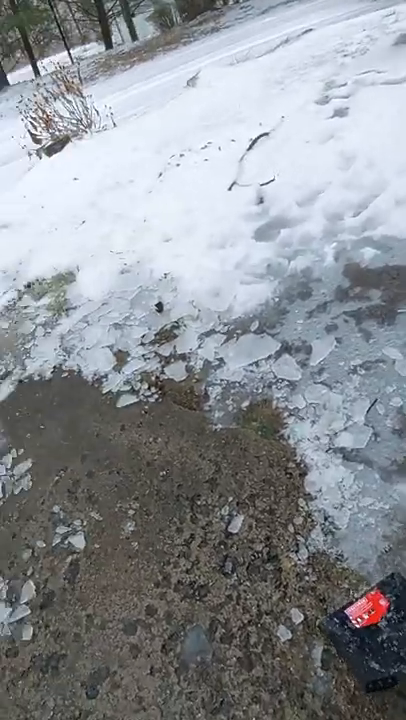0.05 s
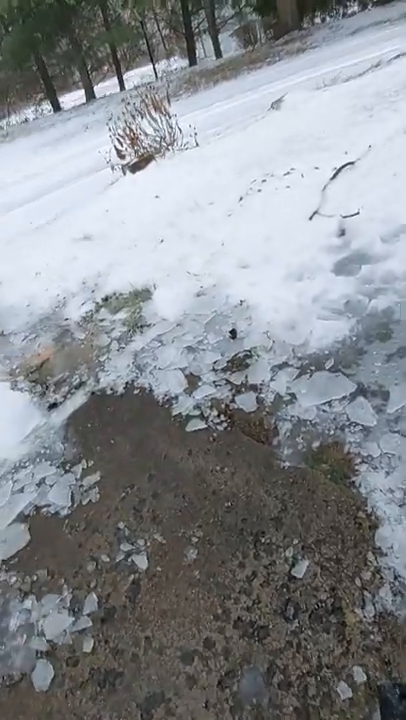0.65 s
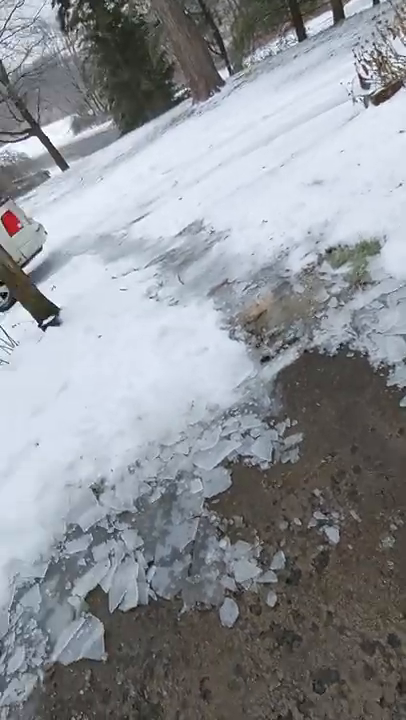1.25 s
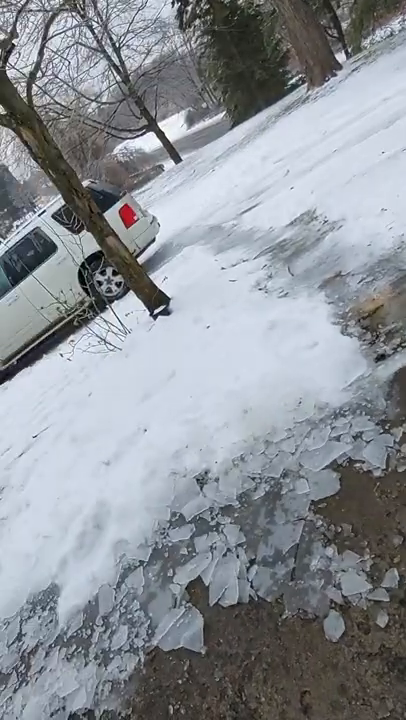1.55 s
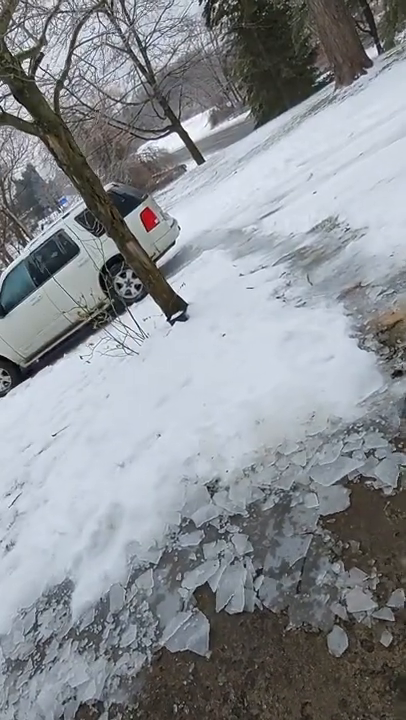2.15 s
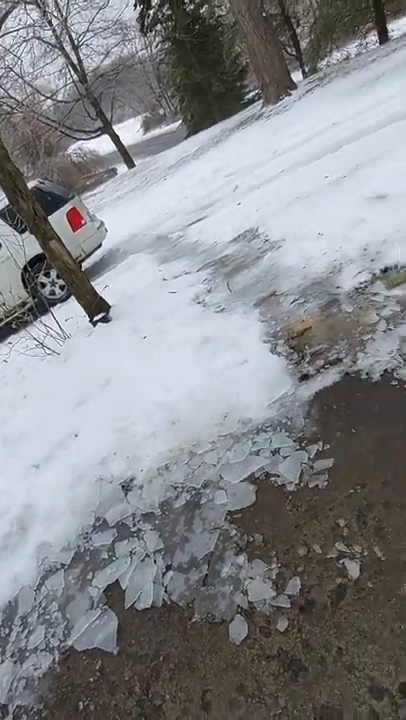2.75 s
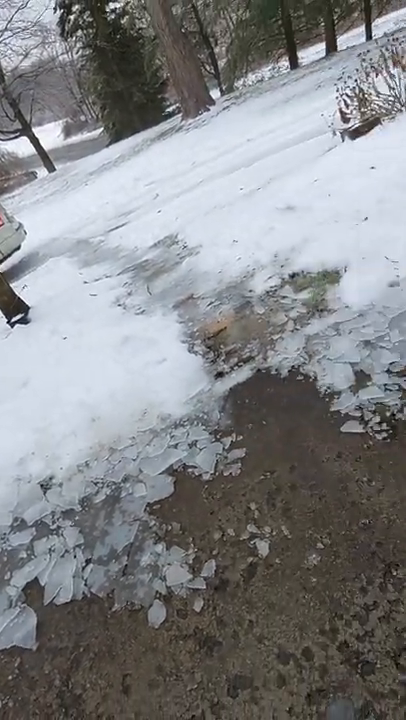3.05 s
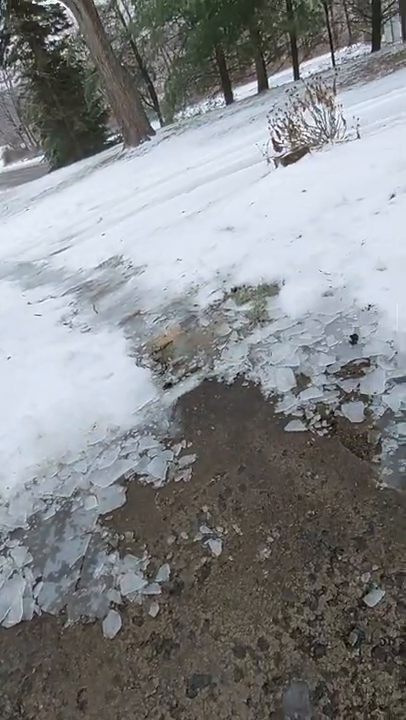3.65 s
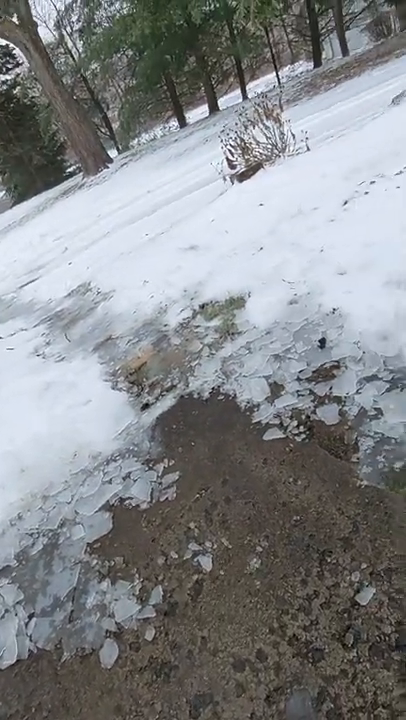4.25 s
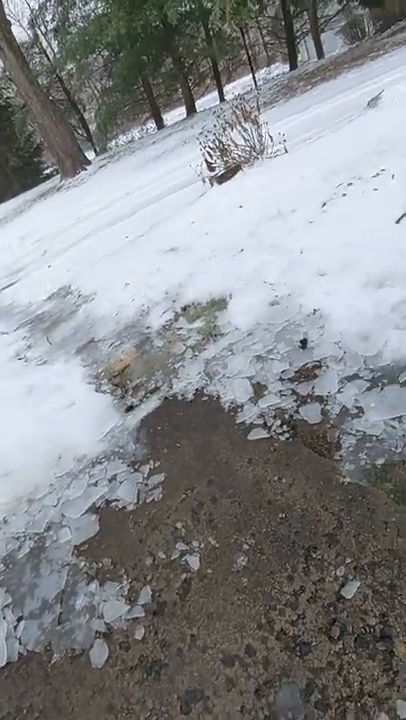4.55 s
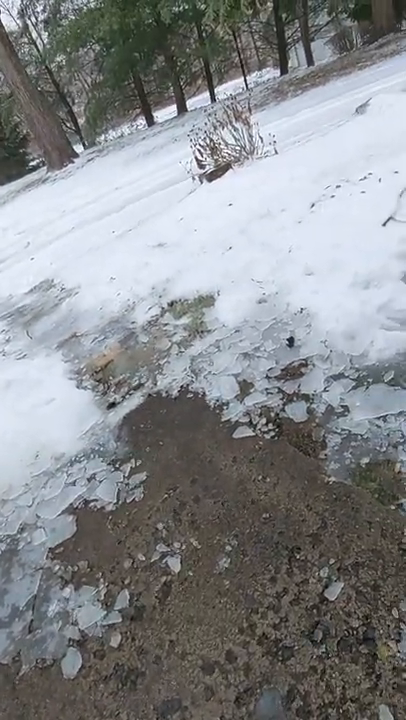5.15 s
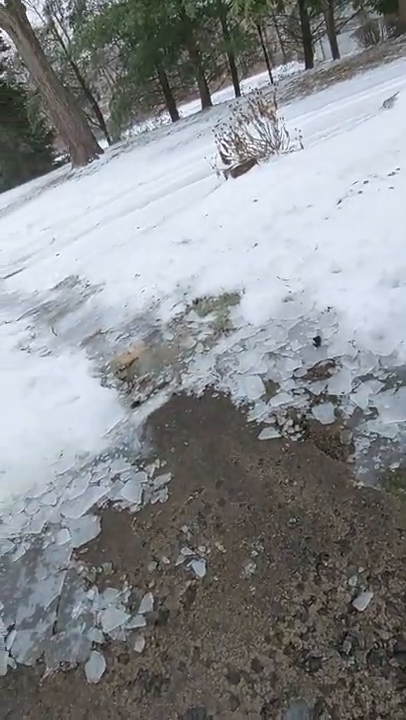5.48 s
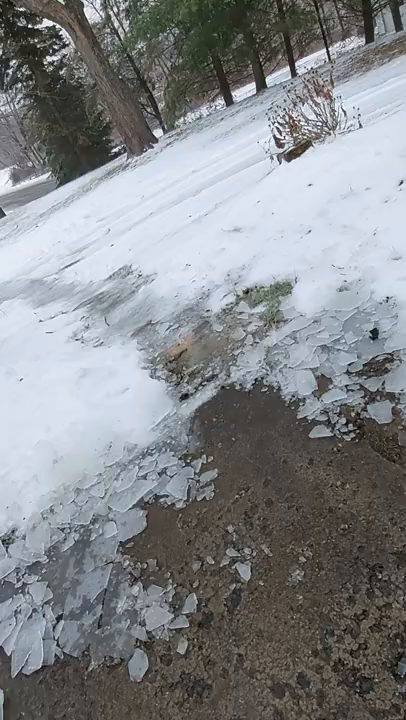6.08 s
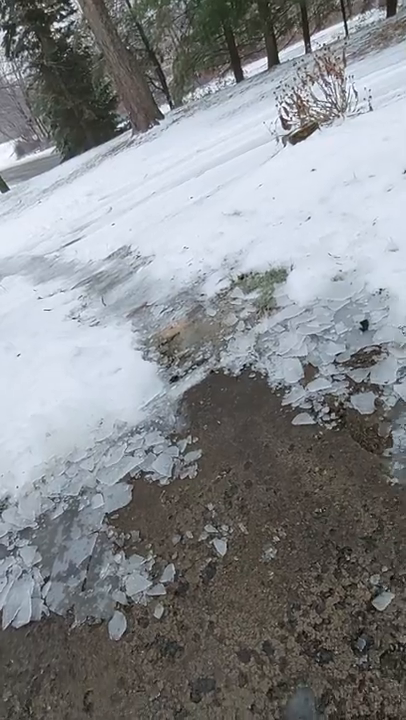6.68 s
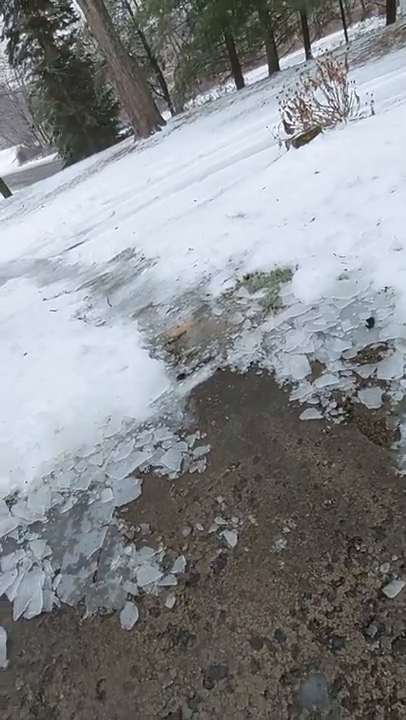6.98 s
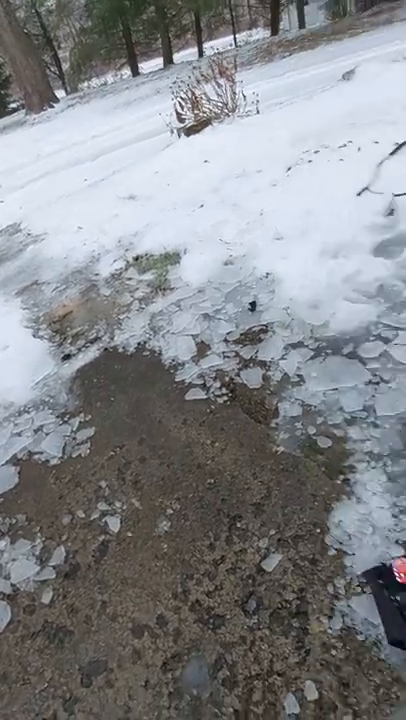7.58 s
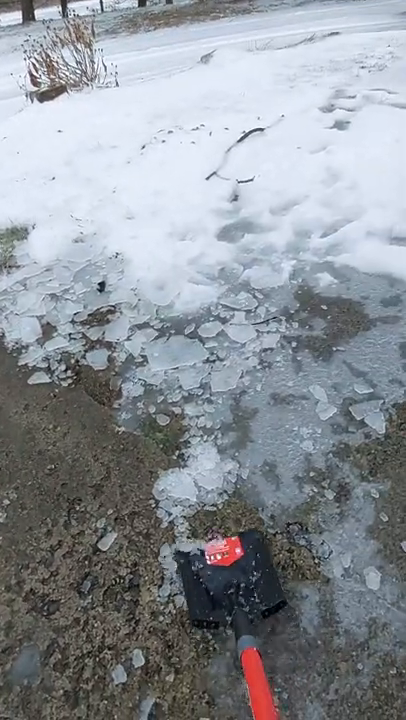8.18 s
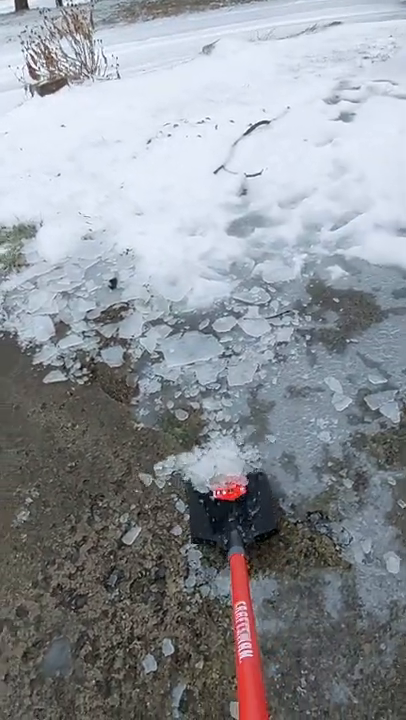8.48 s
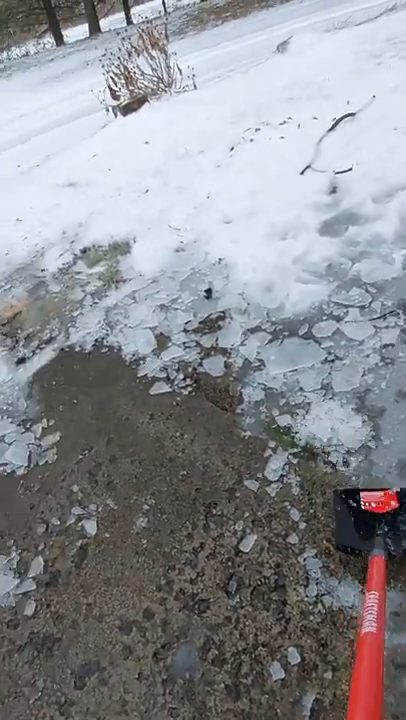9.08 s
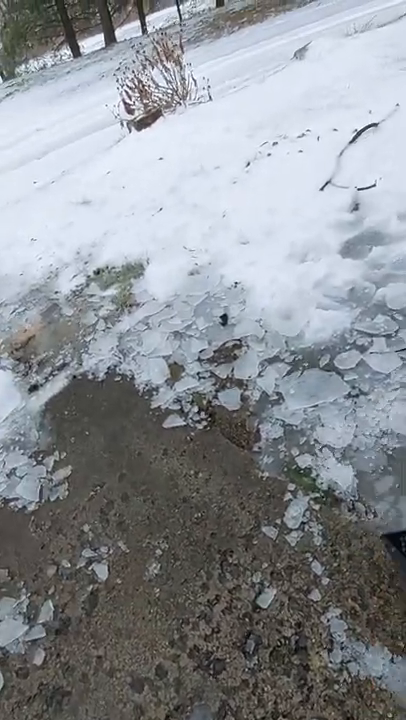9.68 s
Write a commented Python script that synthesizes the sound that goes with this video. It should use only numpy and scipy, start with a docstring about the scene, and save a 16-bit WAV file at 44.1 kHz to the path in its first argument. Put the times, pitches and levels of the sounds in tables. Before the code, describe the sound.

Light wind rumbles and bumps on the microphone in a quiet yard, with soft swishes of a sleeve during the first two seconds. At about 1.4 seconds a shovel close by bites into crusted ice on a concrete path. A harder chop with a short ring of the blade lands at 2.3 seconds, and loose plates of ice click and skitter. More brittle, crunching chops follow near 3.1, 3.6 and 4 seconds. At 4.8 and 5.4 seconds the blade pushes along the concrete in gritty, juddering scrapes, and the wind dies down. Another chop comes at 6.1 seconds. Short chops running into scrapes follow at about 7, 7.5, 8.1, 8.7 and 9.1 seconds, with shards sliding between them. A sleeve swish and one sharp clanking strike come near 9.8 seconds. A faint low drone lies underneath, and the blows have a slight outdoor echo.

```python
"""On a concrete path in a snowy yard, a shovel chops at a crust of ice and pushes under it in long scrapes.
Brittle fracture makes the ice crackle, stick-slip friction makes the edge judder, and both excite the
modes of the blade. Loose plates of ice clatter and slide away, and a sleeve swishes as its cloth rubs.
Light wind bumps the two ports of the microphone over a far low drone; the yard returns a faint echo."""
import sys
import numpy as np
from scipy import signal
from scipy.fft import rfft, irfft
from scipy.io import wavfile

SR = 44100
rng = np.random.default_rng(int(sys.argv[2]) if len(sys.argv) > 2 else 0)


def master(y):
    """Save y as 16-bit WAV."""
    cut = np.clip(np.atleast_2d(y).T, -1, 1)
    pcm = np.round(cut * 32767)  # scale
    wavfile.write(sys.argv[1], SR, pcm.astype(np.int16))


N = 433485
TIME, HZ = np.arange(N) / SR, np.fft.rfftfreq(N, 1 / SR)

# Levels and offsets are relative: each source applies its own gains on top.
# bites of the edge: (time [s], level [dB], thud offset [dB], fizz offset [dB], crushing time [s])
BITES = [(1.392, -26, 7, -13, 0.014), (1.407, -25, 2, -13, 0.023), (2.252, -14, -2, -10, 0.003),
         (2.48, -31.5, -5, -12, .02), (2.495, -23, 0.5, -8.5, 0.033), (2.582, -32, 7, -6, 0.019),
         (3.137, -18.5, -5, -4, 0.025), (3.207, -24.5, 3, -7, 0.0034), (3.582, -15.5, -2.5, -6, 0.023),
         (3.63, -21, 3.5, -8.5, 0.018), (3.996, -16.5, -3.5, -4, 0.021), (4.057, -19.5, -9.5, -8.5, 0.018),
         (4.83, -27, -4, -1, 0.026), (4.985, -16.5, -5, -4.5, 0.0065), (5.355, -24.5, -0.5, -6, 0.0056),
         (5.378, -26, -9, -6, 0.0032), (6.123, -17, -7, -3.5, .035), (6.165, -20, -15, -10, 0.019),
         (6.212, -26, -11, -12, 0.0088), (6.873, -34, -2.5, -8, 0.013), (6.99, -19, -4.5, -0.5, 0.0066),
         (7.434, -38, -6.5, -7, 0.047), (7.481, -20, -3, -2, 0.0024), (8.038, -28.5, 0, -8, .013),
         (8.055, -18, -5, -8.5, .007), (8.142, -23.5, -16, -3, 0.0029), (8.612, -31, -3, -7, 0.015),
         (8.667, -34.5, -6, -4, .008), (9.104, -33.5, 3, -6, 0.015), (9.136, -24, -3, -3.5, 0.0042),
         (9.779, -15.5, -5, -9.5, 0.0028)]
# pushes along the concrete:
# (start [s], time to full force [s], time to release [s], level [dB], thud offset [dB], fizz offset [dB])
PUSHES = [(4.826, 0.05, 0.2, -12.5, -10, -7), (5.384, 0.14, 0.27, -15.5, -6.5, -9.5),
          (6.89, 0.082, 0.097, -25, -6, -8), (6.992, 0.065, 0.15, -12.5, -11.5, -9.5),
          (7.501, .15, 0.23, -17, -10, -10.5), (8.145, .12, 0.24, -12, -10, -10.5),
          (8.664, 0.056, 0.16, -16, -7, -10), (9.138, .15, 0.2, -22, -4.5, -8.5)]
# modes of the blade: (frequency [Hz], t60 [s], level on the ground [dB], level when free [dB])
BLADE_MODES = [(283, 0.35, -12, 1), (308.4, 0.12, -7, -30), (341, 0.84, -34, 3.5), (444, 0.48, -30, 5.5),
               (647.1, 0.33, 15.5, 6), (673.6, 0.061, 11.5, -29), (930, 0.93, 15, -16.5),
               (968, 0.071, 9.5, -27), (1272, 0.4, 10, -20), (1661, 0.66, 15, -21), (1725, 0.27, 19, -26),
               (2296, 0.25, 21, -45), (2533, 0.36, 14, -25), (2710, 0.05, 7, -40), (3937, 0.06, 14.5, -35),
               (4030, 0.051, 3, -23)]
# coupling of chops to the modes; a steep blade is damped by the ice, a flat one rings: (time [s], gain [dB])
CHOP_COUPLING = [(1.4, -25), (2.3, -4), (3.15, -16), (4.05, -10), (5, -5.5), (6.15, -12), (8.06, -1.5),
                 (9.15, -2), (9.78, -4.5)]
# the edge catches on a resonance of blade or crust; the two rows at 9.779 give the low boom of the last heavy
# blow: (start [s], duration [s], frequency [Hz], level [dB])
CATCHES = [(1.39, 0.042, 349, -19.5), (1.392, 0.053, 2350, -27.5), (3.135, .043, 293, -24.5),
           (3.136, 0.022, 4080, -18), (3.164, 0.049, 667, -23.5), (3.621, 0.033, 3930, -18.5),
           (3.997, .03, 397, -23), (4.863, 0.075, 3960, -20.5), (4.947, .092, 1140, -22),
           (5.046, 0.096, 644, -33.5), (5.458, 0.049, 638, -20.5), (5.6, .08, 1870, -25),
           (5.601, 0.051, 2250, -23), (6.961, 0.15, 4120, -25), (7.053, .12, 663, -21),
           (8.054, .015, 566, -16.5), (8.226, .048, 700, -23), (8.304, 0.026, 2620, -18.5),
           (9.266, 0.06, 625, -29.5), (9.779, 0.014, 593, -14.5), (9.779, 0.024, 317, -23.5)]
# the blade bounces off the ground: (time [s], level [dB], tilt [dB/octave])
REBOUNDS = [(2.256, -24.5, -8.5), (2.502, -39, 9.5), (2.905, -44.5, 6), (6.19, -43.5, 10.5),
            (8.535, -56, 6)]
# single plates of ice click, along with a few light taps of the edge such as at 4.117 and 4.275 s: (time [s],
# level [dB], knock offset [dB])
ICE_CLICKS = [(0.109, -35, 3), (0.195, -33.5, -12), (1.607, -33.5, 8), (2.128, -39, 7), (2.425, -35, -1),
              (2.678, -29.5, 18), (2.734, -30, 8), (2.7587, -26, 3), (2.8452, -24.5, 5),
              (2.903, -26.5, 8), (4.117, -18.5, -5), (4.2482, -40, 32), (4.275, -21.5, 0),
              (4.6546, -31, -3), (5.803, -23, -14), (6.3624, -27.5, 3), (6.481, -41, -28),
              (6.572, -28.5, 3), (8.539, -33.5, 22.5)]
# loose ice slides on after a stroke: (start [s], duration [s], level [dB])
SLIDES = [(2.38, 0.63, -41), (4.214, 0.18, -41.5), (5.132, 0.23, -40.5), (5.738, 0.38, -33.5),
          (6.565, .15, -54), (7.21, 0.36, -52.5), (7.8, 0.23, -49.5), (8.49, 0.25, -44.5),
          (8.872, 0.25, -43.5), (9.381, 0.43, -43.5)]
# swings of the sleeve: (fastest moment [s], half duration [s], level [dB], fizz offset [dB])
SLEEVE_SWINGS = [(0.383, 0.13, -40, -4.5), (0.558, 0.092, -42.5, -16), (0.797, 0.11, -42.5, -9),
                 (1.063, 0.12, -39.5, -1), (1.18, 0.17, -47.5, -30), (1.354, 0.12, -37.5, 1.5),
                 (1.732, .05, -44, -18), (2.206, 0.047, -41.5, -11), (9.71, 0.076, -40.5, 2)]
# eddies that strike the microphone, and the strength of the wind: (time [s], level [dB])
EDDIES = [(.07, -33.5), (.237, -30.5), (.302, -34.5), (.445, -30.5), (2.089, -41.5), (3.397, -27),
          (4.582, -35), (4.752, -30.5)]
GUSTS = [(0, -32.5), (0.4, -32.5), (0.75, -39.0), (1.1, -34), (1.45, -32.5), (1.75, -37), (2.3, -33),
         (2.8, -38), (3.4, -32.5), (3.9, -37.5), (4.7, -35.5), (5.4, -46), (6.5, -46.5), (7.2, -56),
         (8, -67.5), (9.5, -59)]
# spectra of breaking ice, sliding shards or cloth, wind, drone and hush: (frequency [Hz], level [dB])
ICE_SPECTRUM = [(120, -30.5), (280, 6), (420, 3.5), (700, 3.5), (1000, -5), (1600, -9), (2600, -7),
                (4100, -7.5), (5200, -9), (7600, -6.5), (9400, -20.5), (10600, -14.5), (12600, -8.5),
                (16000, -15.5)]
RUB_SPECTRUM = [(200, -9), (600, -5.5), (1200, 0), (2300, 1.5), (3600, -5), (6000, -3.5), (8200, -6.5),
                (9500, -20), (12800, -7.5), (16000, -15)]
WIND_SPECTRUM = [(20, -50), (50, -3), (75, -3), (135, -1), (200, -9), (300, -16.5), (500, -31.5),
                 (1200, -54.5)]
DRONE_SPECTRUM = [(25, -46), (55, 2), (90, -13.5), (140, 6.5), (175, 5.5), (230, -17.5), (400, -11.5),
                  (900, -46)]
HUSH_SPECTRUM = [(120, -47), (200, 0.5), (268, -9.5), (473, -13), (851, -15), (2170, -20), (2800, -28.5),
                 (7410, -30), (9400, -78), (16000, -43)]
# reverberation time of the yard: (frequency [Hz], t60 [s])
YARD_DECAY = [(200, 0.17), (700, 0.89), (2500, 1), (7000, 0.99), (15000, 1)]
# likeness of the two microphone ports: (frequency [Hz], coherence [0 to 1])
PORT_COHERENCE = [(100, 1), (600, 1), (1400, 0.54), (3000, 0.06), (6000, 0.26), (15000, 0.13)]
# balance of the shovelling between the ports: (frequency [Hz], left over right [dB])
PORT_BALANCE = [(60, -17), (110, -13), (200, -5.5), (380, -1), (700, 0.5), (1290, 0.0), (2380, -3),
                (4400, -2.0), (8120, -1.5), (15000, 0)]


def chops(snap_db=7.5, snap_s=0.0039, crush_t60=0.13, crumbs_db=-23, crumbs_t60=0.41):
    """Brittle fracture: the crust snaps, crushes and sheds crumbs under the thud of the edge."""
    fractures = crackle(per_s=1700, spread_db=4, grit_db=-2, chatter_db=3.04, chatter_hz=65)
    bands = registers(fractures)
    out, size = np.zeros((2, N)), SR // 3
    snap = amp(snap_db * np.exp(-TIME[:size] / snap_s))
    for (start, db, thud_db, fizz_db, hold), chance in zip(BITES, rng.random((len(BITES), 8))):
        fresh = int(chance[0] * (N - size))  # every blow breaks new ice
        thud, crunch, fizz = (band[:, fresh:fresh + size] for band in bands)
        crack = slab_clank(crunch, chance[1:]) + amp(fizz_db + 1) * fizz
        bite = snap * burst(size, hold, crush_t60, rise=0.0043 + 0.03 * hold)
        crumbs = amp(crumbs_db) * burst(size, hold, crumbs_t60, rise=0.01)
        weight = amp(thud_db - 2) * thud * burst(size, 1.08 * hold, t60=0.15, rise=0.0037)
        add(out, start - 0.001, amp(db) * (crack * np.maximum(bite, crumbs) + weight))
    return out


def slab_clank(crunch, chance, ring_db=-18, t60=0.03):
    """Damped resonance: each piece of crust has a few short modes of its own, so a blow clanks."""
    t = TIME[:SR // 10]
    mode_hz = 1200 * 4.5 ** chance
    modes = np.sin(2 * np.pi * np.outer(mode_hz, t)).sum(0) * amp(-60 * t / t60)
    ring = signal.fftconvolve(crunch, amp(ring_db) * modes[None] / np.linalg.norm(modes), axes=1)
    return unit(crunch + ring[:, :crunch.shape[1]])


def scrapes(build_db=15, sag_db_per_s=62.5, release_db_per_s=299, dull_db_per_s=21):
    """Sliding friction: the edge judders over gravel in the concrete and grinds ice, louder with force."""
    grinding = crackle(per_s=1100, spread_db=-2.5, grit_db=0.5, chatter_db=1.3, chatter_hz=56)
    bands = registers(grinding)
    out, t = np.zeros((2, N)), TIME[:SR // 2]
    onset = np.minimum(t / 0.0027, 1)
    for start, full, let_go, db, thud_db, fizz_db in PUSHES:
        force_db = (-build_db * np.maximum(1 - t / full, 0)
                    - sag_db_per_s * np.maximum(t - full, 0)  # the ice gives
                    - release_db_per_s * np.maximum(t - let_go, 0))
        dull_db = dull_db_per_s * (t - full)  # crushed ice packs under the edge
        thud, grind, fizz = (band[:, round(start * SR):][:, :len(t)] for band in bands)
        ice = amp(thud_db - 4) * thud + amp(-2.5) * grind + amp(fizz_db - dull_db) * fizz
        add(out, start, onset * amp(db + force_db) * ice)
    return out


def blade_ring(drive, roam_db=9.5, bend_s=0.000381, groups=3, loss_db_per_cycle=0.26):
    """Forced vibration: the blade's modes take turns as the contact roams; pressure bends their pitch."""
    t, modes, ring = TIME[:SR // 2], [], np.zeros((2, N))
    for hz, t60, db, _ in BLADE_MODES:
        ice_loss_db = loss_db_per_cycle * max(hz - BLADE_MODES[2][0], 0) * t  # packed ice damps high modes
        unity_gain = 2 * np.log(1000) / (t60 * SR)
        modes.append(unity_gain * amp(db - 60 * t / t60 - ice_loss_db) * np.cos(2 * np.pi * hz * t))
    for k in range(groups):
        contact = amp(roam_db * np.tanh(wobble(9.7)))
        ring += signal.oaconvolve(drive * contact, sum(modes[k::groups])[None], axes=1)[:, :N]
    bent_time = TIME + bend_s * wobble(11.2)
    return np.array([np.interp(bent_time, TIME, side) for side in ring])


def catches(q=12):
    """Stick-slip friction locks briefly onto one resonance and gives a rough, hollow tone; the last heavy blow
    also booms at two low pitches."""
    out = np.zeros((2, N))
    for start, length, hz, db in CATCHES:
        size = round(length * SR)
        tone = signal.lfilter(*signal.iirpeak(hz, q, fs=SR), rng.standard_normal((2, SR // 2)))[:, -size:]
        add(out, start, amp(db - 1) * unit(tone * signal.windows.tukey(size, 0.7)))
    return ports(*out)


def rebounds(damped_t60=0.34):
    """Free vibration: off the ground, the blade's low bending modes ring until the next bite damps them."""
    out, t = np.zeros((1, N)), TIME[:SR]
    for start, db, tilt in REBOUNDS:
        free_s = min(bite[0] for bite in BITES if bite[0] > start + 0.03) - start
        ring = np.zeros((1, SR))
        for hz, t60, _, free_db in BLADE_MODES:
            mode_db = db + free_db + tilt * np.log2(hz / BLADE_MODES[2][0])
            ring += amp(mode_db - 60 * t / t60) * np.sin(2 * np.pi * hz * t)
        add(out, start, ring * burst(SR, free_s, damped_t60, rise=0.0015))
    return out


def plates(resonance_db=3, q=14, tail_t60=0.52):
    """Impact excites each loose plate, or the ice under a light tap of the edge, at its own pitch; small ones
    die sooner and sound brighter."""
    out, t = np.zeros((2, N)), TIME[:SR // 4]
    knock, click, fizz = registers(crackle(per_s=800, spread_db=1, grit_db=6, chatter_db=1, chatter_hz=100))
    for (start, db, knock_db), chance in zip(ICE_CLICKS, rng.random(len(ICE_CLICKS))):
        at, bulk = round((start - 0.001) * SR), amp((db + 12) / 2)
        decay = amp(-60 * t / (0.11 * bulk)) + amp(-16 - 60 * t / tail_t60)
        ice = click + amp(-11) * fizz / bulk + amp(knock_db) * knock * bulk
        hit = amp(db - 8) * decay * ice[:, at:at + len(t)]
        mode = signal.iirpeak(2500 * 3 ** chance, q, fs=SR)
        add(out, start - 0.001, hit + amp(resonance_db) * signal.lfilter(*mode, hit))
    return out


def slides(chips_per_s=28, chip_t60=0.0093, settle_db_per_s=13.5, fade_s=0.019):
    """Friction and small impacts: shards skitter over the path, and chips tick dryly among them."""
    colour = amp(read(RUB_SPECTRUM, HZ))
    shards = shaped(crackle(per_s=600, spread_db=3.5, grit_db=6, chatter_db=1.4, chatter_hz=50), colour)
    landings = (rng.random(N) < chips_per_s / SR) * amp(-20 * rng.random(N))
    decays = signal.lfilter([1], [1, -amp(-60 / (chip_t60 * SR))], landings)
    chips = shaped(decays * rng.standard_normal((2, N)), colour * np.sqrt(HZ))  # small chips sound brighter
    sliding = np.zeros(N)
    for start, length, db in SLIDES:
        gate = np.clip(np.minimum(TIME - start, start + length - TIME) / fade_s + 0.5, 0, 1)
        sliding += gate * amp(db - settle_db_per_s * np.maximum(TIME - start, 0))
    return (shards + amp(-8) * chips) * sliding + amp(-58) * chips  # a few keep ticking between strokes


def swishes(falloff_db=20.5):
    """Friction noise grows with speed, so the cloth of the sleeve is loudest in mid-swing."""
    cloth = crackle(per_s=9000, spread_db=4.5, grit_db=2, chatter_db=1.5, chatter_hz=30)
    low, rub, fizz = registers(cloth, RUB_SPECTRUM)
    out = np.zeros((2, N))
    for fastest, half, db, fizz_db in SLEEVE_SWINGS:
        swing = amp(db - falloff_db * np.minimum(abs(TIME - fastest) / half, 5) ** 1.65)
        out += swing * (rub + amp(-6) * low + amp(fizz_db - 1) * fizz)
    return out


def buffets(length_s=0.052, band_hz=(70, 260)):
    """Pressure pulses of single eddies thump the ports, the right one harder."""
    out, size = np.zeros((2, N)), round(length_s * SR)
    band = signal.butter(2, band_hz, "bandpass", fs=SR, output="sos")
    for centre, db in EDDIES:
        eddy = signal.sosfilt(band, rng.standard_normal((2, SR // 4)))[:, -size:] * np.hanning(size)
        add(out, centre - length_s / 2, amp(db) * unit(eddy))
    return out * amp([[-2], [1]])


def wind():
    """Turbulent pressure is local, so the gusts rumble at each port independently."""
    gust = amp(np.interp(TIME, *np.transpose(GUSTS)) + 6)
    turbulence = rng.standard_normal((2, N)) * amp([wobble(21), wobble(28)])
    return gust * shaped(turbulence, amp(read(WIND_SPECTRUM, HZ))) * amp([[-1], [1]])


def yard_echo(direct, near_db=-6, near_t60=0.086, far_db=-24, taps_per_s=2500):
    """Reflection adds quick echoes from the path and a thin tail from house and trees."""
    t = TIME[:SR]
    taps = rng.standard_normal((2, SR)) * (rng.random((2, SR)) < taps_per_s / SR) * (t > 0.004)
    near = taps * amp(-60 * t / near_t60)
    hz, delay, late = signal.stft(taps * (t > 0.025), SR, nperseg=256)
    decay = amp(-60 * delay / read(YARD_DECAY, hz)[:, None])
    far = signal.istft(late * decay, SR, nperseg=256)[1][:, :SR]
    echo = amp(near_db) * near / np.linalg.norm(near[0]) + amp(far_db) * far / np.linalg.norm(far[0])
    return direct + signal.fftconvolve(direct, echo, axes=1)[:, :N]


def ambience(spectrum, db):
    """Stationary noise, partly coherent between the ports: the far drone or the hush of the yard."""
    return amp(db) * shaped(ports(*rng.standard_normal((2, N))), amp(read(spectrum, HZ)))


def crackle(per_s, spread_db, grit_db, chatter_db, chatter_hz, decay_s=0.00027):
    """A Poisson process of tiny, unequal fractures over fine grit, bunched by stick and slip."""
    cracks = (rng.random(N) < per_s / SR) * amp(spread_db * np.minimum(rng.exponential(1, N), 4))
    power = signal.lfilter([1], [1, -np.exp(-1 / (decay_s * SR))], cracks ** 2)
    envelope = np.sqrt(power / power.mean() + amp(grit_db) ** 2) * amp(chatter_db * wobble(chatter_hz))
    return ports(*(envelope * rng.standard_normal((2, N))))


def ports(a, b, lag_s=0.00023):
    """Path difference delays the left port; scattering makes the treble differ between the two."""
    coherence = np.clip(read(PORT_COHERENCE, HZ), 0, 1)
    common = rfft(a) * np.sqrt((1 + coherence) / 2)
    apart = rfft(b) * np.sqrt((1 - coherence) / 2)
    return irfft([(common + apart) * np.exp(-2j * np.pi * HZ * lag_s), common - apart], N)


def registers(x, spectrum=ICE_SPECTRUM, thud_hz=950, fizz_hz=9000):
    """Crossover filtering colours x and splits it into low, middle and high bands, each of rms 1."""
    low = 1 / (1 + (HZ / thud_hz) ** 8)
    high = 1 / (1 + (fizz_hz / (HZ + 1)) ** 16)
    colour = amp(read(spectrum, HZ))
    return [shaped(x, colour * part) for part in (low, 1 - low - high, high)]


def burst(size, hold, t60, rise):
    """An envelope that builds, holds and decays exponentially; its times are in seconds."""
    t = TIME[:size]
    return np.minimum(t / rise, 1) ** 2 * amp(-60 * np.maximum(t - hold, 0) / t60)


def wobble(hz):
    """Low-passed noise: a smooth random fluctuation of rms 1."""
    return shaped(rng.standard_normal(N), 1 / (1 + (HZ / hz) ** 4))


def shaped(x, gain):
    """Linear filtering by a gain at each frequency, scaled to rms 1."""
    return unit(irfft(rfft(x) * gain, N))


def read(points, hz):
    """Interpolation of a table along log frequency."""
    f, value = np.transpose(points)
    return np.interp(np.log(hz + 1), np.log(f + 1), value)


def unit(x):
    """Normalisation to rms 1."""
    return x / np.sqrt(np.mean(x ** 2) + 1e-20)


def amp(db):
    """Amplitude ratio of a level in decibels."""
    return 10 ** (np.asarray(db) / 20)


def add(mix, start, sound):
    """Superposition of a sound on the mix, from a start in seconds."""
    part = mix[:, max(round(start * SR), 0):][:, :sound.shape[1]]
    part += sound[:, :part.shape[1]]


def scene(scrape_coupling_db=-4, loose_coupling_db=-10):
    """Superposition: the ice drives the blade just ahead and a little to the right, amid wind and hush."""
    chop, scrape, loose = chops(), scrapes(), slides() + plates()
    chop_coupling = amp(np.interp(TIME, *np.transpose(CHOP_COUPLING)))
    drive = chop_coupling * chop + amp(scrape_coupling_db) * scrape + amp(loose_coupling_db) * loose
    work = chop + scrape + loose + blade_ring(drive) + catches() + rebounds() + swishes()
    balance = amp(np.outer([0.5, -0.5], read(PORT_BALANCE, HZ)))
    heard = irfft(rfft(yard_echo(work)) * balance, N)
    return heard + wind() + ambience(DRONE_SPECTRUM, db=-43) + ambience(HUSH_SPECTRUM, db=-49) + buffets()


def record(dry, top_hz=16000):
    """Hard clipping holds the peaks at full scale; a low-pass filter then limits the band."""
    low_pass = signal.firwin(511, top_hz, window=("kaiser", 8), fs=SR)
    return signal.oaconvolve(np.clip(dry, -1, 1), low_pass[None], "same", axes=1)


dry = scene()
out = record(dry)
master(out)
```